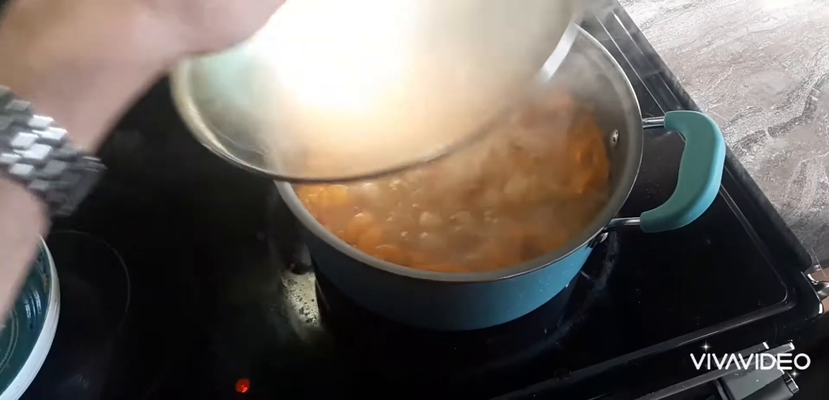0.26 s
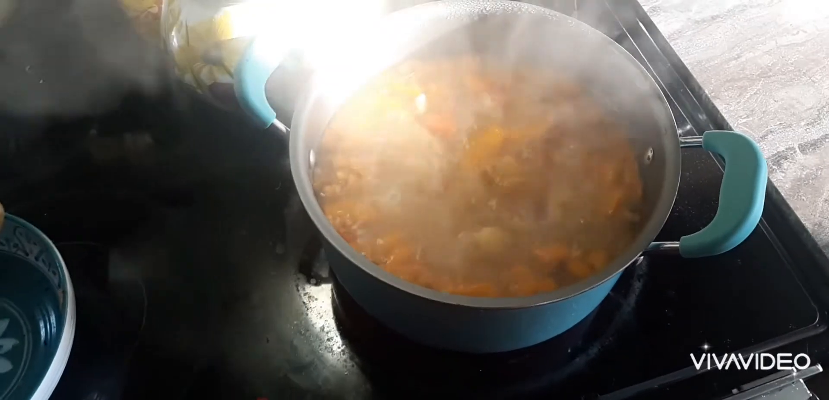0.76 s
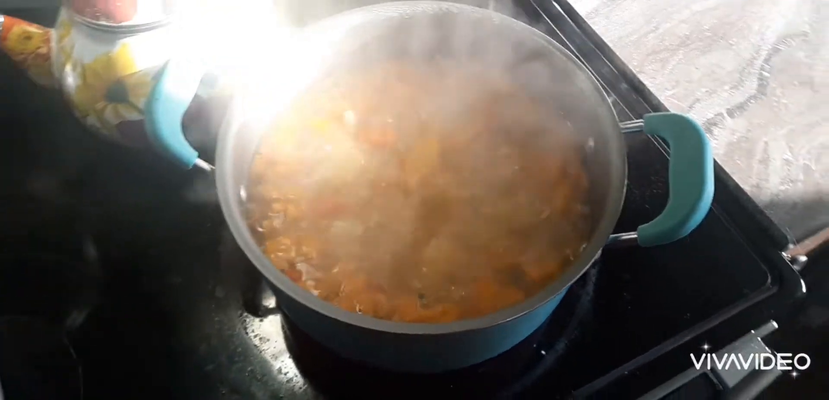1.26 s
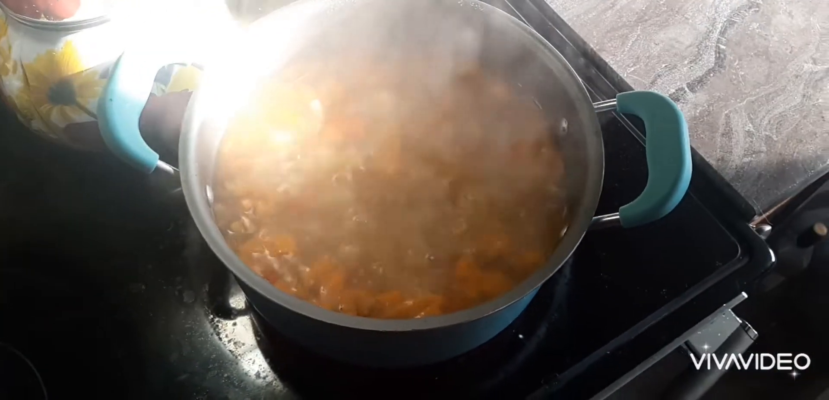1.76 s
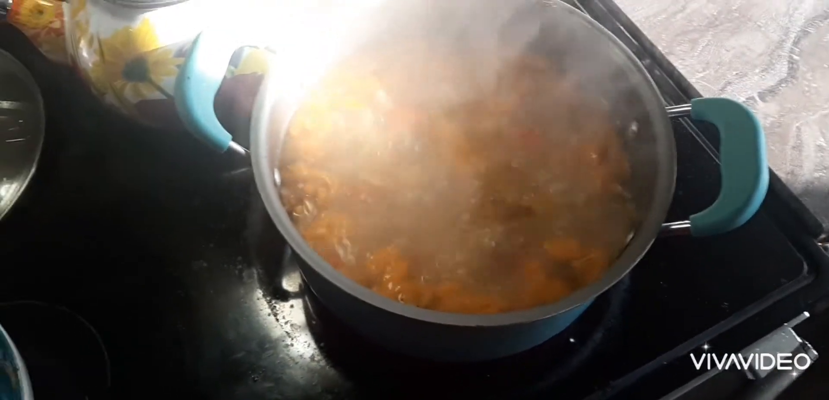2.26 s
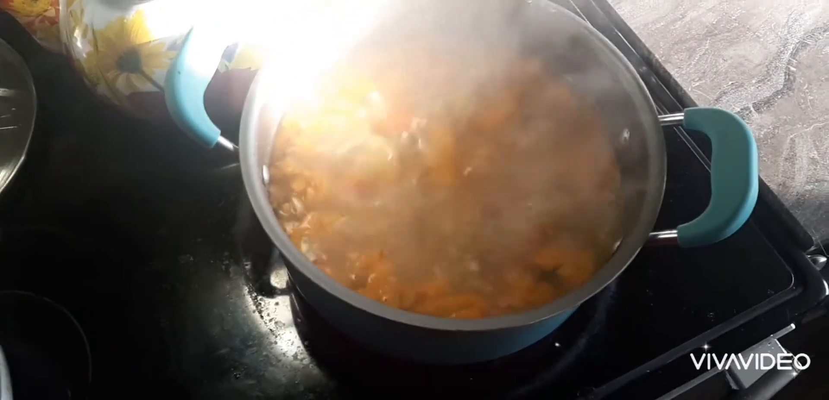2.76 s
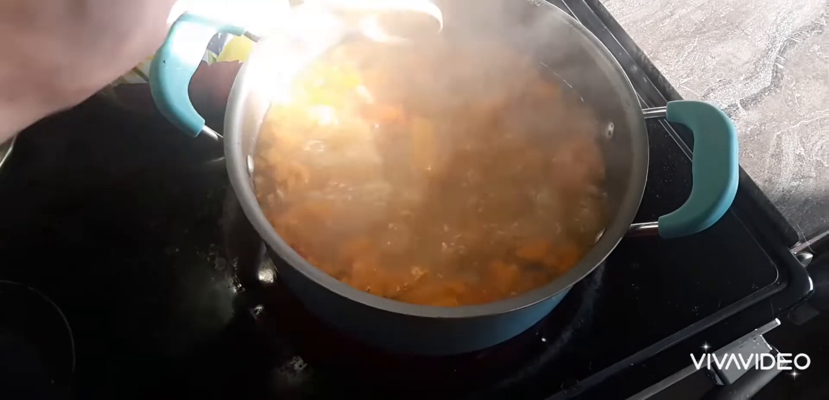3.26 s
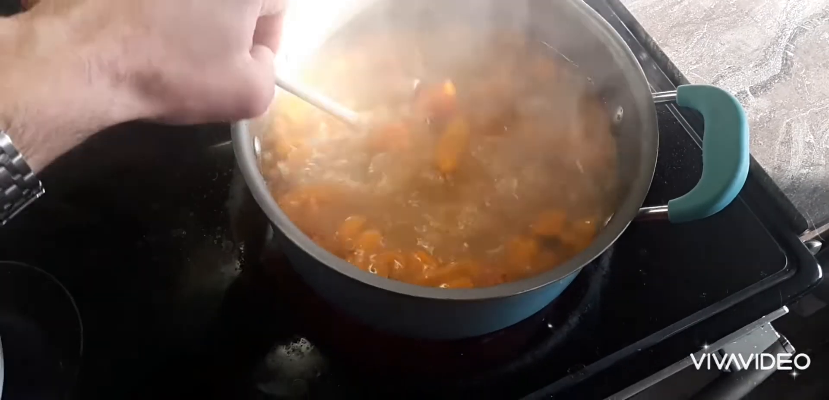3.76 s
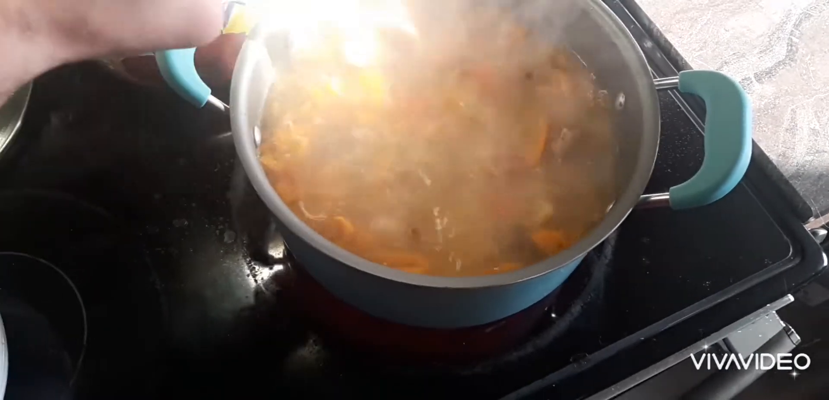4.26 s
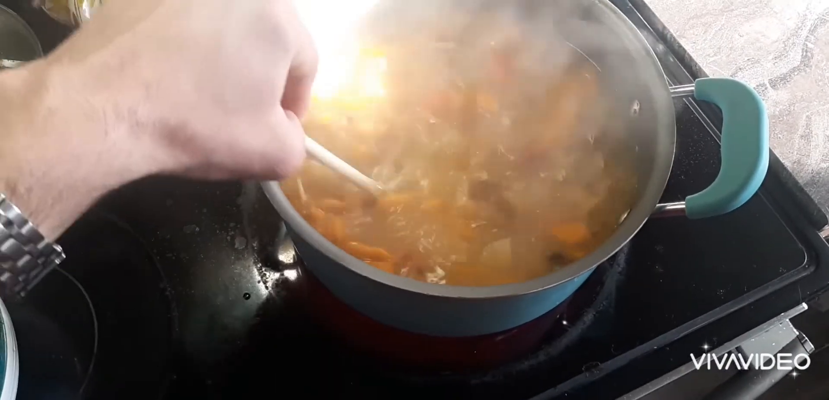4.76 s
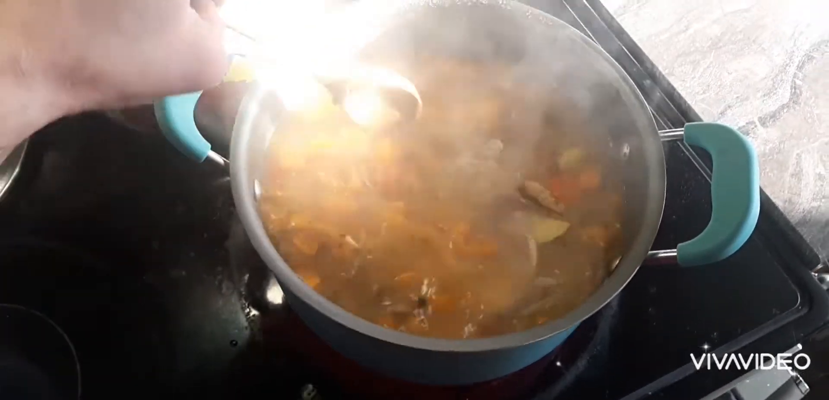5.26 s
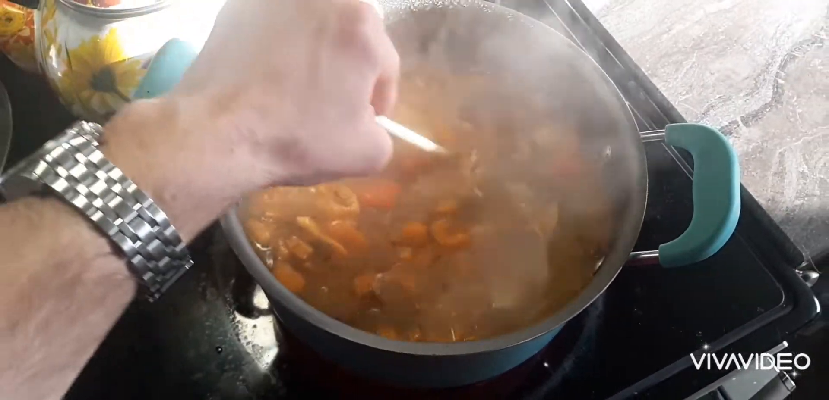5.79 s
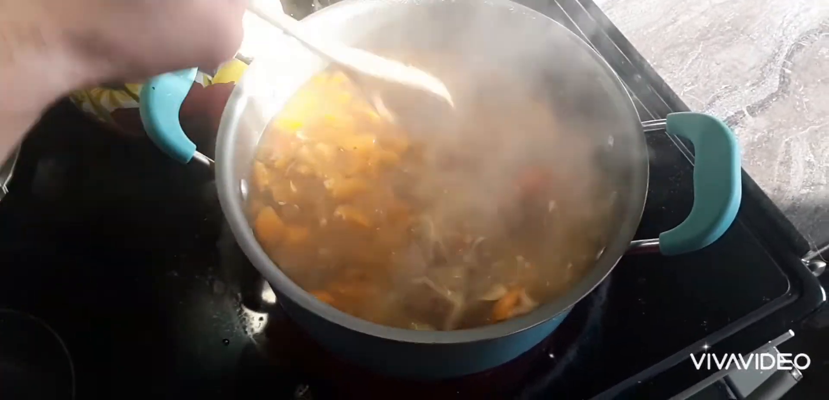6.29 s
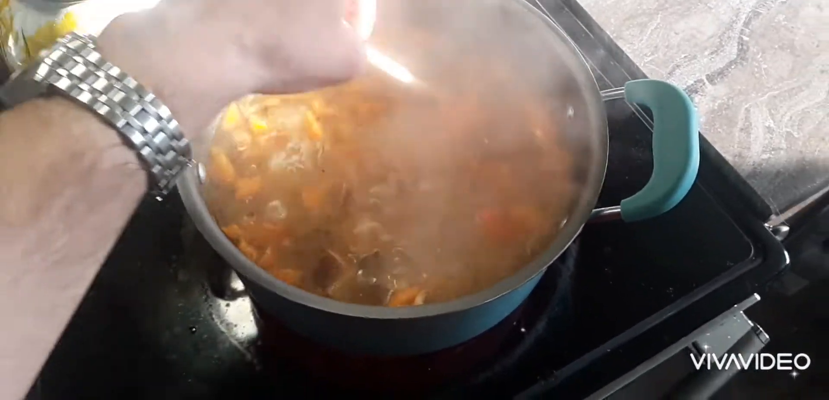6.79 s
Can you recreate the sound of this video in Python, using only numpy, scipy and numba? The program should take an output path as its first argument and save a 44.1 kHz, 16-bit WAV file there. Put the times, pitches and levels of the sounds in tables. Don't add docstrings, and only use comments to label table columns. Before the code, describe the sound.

Soup simmers softly in a pot; a glass lid clatters loudly onto the worktop, then a wooden spoon stirs and knocks the pot wall.

```python
import sys
import numpy as np
from scipy import signal
from scipy.fft import rfft, irfft, next_fast_len
from scipy.io import wavfile
from scipy.ndimage import uniform_filter1d
from numba import njit

SR = 44100
rng = np.random.default_rng(int(sys.argv[2]) if len(sys.argv) > 2 else 0)


def materialize(psi):
    bounded = np.clip(np.atleast_2d(psi).T, -1, 1)
    quanta = np.round(bounded * 32767).astype(np.int16)
    wavfile.write(sys.argv[1], SR, quanta)


def volts_from_decibels(level):
    exponent = np.asarray(level, float) / 20
    return 10 ** exponent


N = 310023
T = np.arange(N) / SR


def level(x, db):
    return x * volts_from_decibels(db) / np.sqrt(np.mean(x ** 2))


def band(x, lo_hz, hi_hz, order=2):
    return signal.sosfilt(signal.butter(order, [lo_hz, min(hi_hz, .45 * SR)], "band", fs=SR, output="sos"), x)


def colour(x, table):
    hz, db = np.transpose(table)
    count = x.shape[-1]
    size = next_fast_len(count)
    f = np.fft.rfftfreq(size, 1 / SR)
    gain = volts_from_decibels(np.interp(np.log(f + 1), np.log(hz), db))
    return irfft(rfft(x, size) * gain, size)[..., :count]


def walk(rate_hz):
    k = int(SR / rate_hz)
    steps = np.repeat(rng.standard_normal(N // k + 1), k)
    return uniform_filter1d(uniform_filter1d(steps, k), k)[:N]


def contact(t, push_s):
    return 1 - np.exp(-(t / push_s) ** 2)


def ring(hz, t60_s, push_s=0.00038, size=8000):
    t = np.arange(size) / SR
    return np.sin(2 * np.pi * hz * t) * np.exp(-np.log(1000) * t / t60_s) * contact(t, push_s)


def burst(lo_hz, hi_hz, decay_s, push_s=0.0004, size=1500):
    t = np.arange(size) / SR
    noise = level(band(rng.standard_normal(size), lo_hz, hi_hz), 0)
    return noise * np.exp(-t / decay_s) * contact(t, push_s)


def swells(rows, rise_s, fall_s, bright=0):
    gain = np.zeros(N)
    for s, hold_s, db, *tone in rows:
        near = slice(max(int((s - rise_s) * SR), 0), int((s + hold_s + 10 * fall_s) * SR))
        rise = np.clip((T[near] - s) / rise_s + 1, 0, 1)
        fall = np.exp(-np.maximum(T[near] - s - hold_s, 0) / fall_s)
        gain[near] = np.maximum(gain[near], volts_from_decibels(db + bright * sum(tone)) * rise * fall)
    return gain


def add(track, s, sound):
    i = int(s * SR)
    track[..., i:i + sound.shape[-1]] += sound[..., :N - i]


def pan(pan_db):
    return volts_from_decibels(np.array([[pan_db], [-pan_db]]) / 2)


def ports(x, lead_s, pan_db):
    size = next_fast_len(N)
    sides = np.array([[1], [-1]])
    turn = np.exp(1j * np.pi * np.fft.rfftfreq(size, 1 / SR) * lead_s * sides)
    return irfft(rfft(x, size) * turn, size)[:, :N] * pan(pan_db)


# (band [Hz], t60 [s], echo energy [dB])
ECHO_BANDS = [(113, 0.36, -6.5), (300, 0.23, -6), (700, 0.2, -9), (1500, 0.42, -6.5), (3000, 0.29, -5),
              (6300, 0.26, -9), (10200, 0.067, -6)]


def room(x):
    t = np.arange(SR // 2) / SR
    tail = 0
    for hz, t60_s, db in ECHO_BANDS:
        noise = band(rng.standard_normal((2, len(t))), hz / 1.55, hz * 1.55)
        mid, side = noise * np.exp(-np.log(1000) * t / t60_s) * contact(t, .005)
        both = mid + min(hz / 1100, 1) * side * np.array([[1], [-1]])
        tail = tail + both * volts_from_decibels(db) * np.sqrt(2 * hz / SR / np.sum(mid ** 2))
    return signal.fftconvolve(x[None], tail, axes=1)[:, :N]


# (frequency [Hz], level [dB rms])
HUM_LINES = [(53.8, -79.5), (118.4, -67.5), (269.2, -79), (522.2, -86), (672.9, -93.5)]
# (frequency [Hz], density [dB per Hz])
AIR_COLOUR = [(20, 14), (70, 17.5), (170, 12), (320, 4.5), (1250, -4.5), (4500, -4), (6400, 0.5),
              (11500, -12)]
AIR_DB = -69.5


def fridge():
    lines = np.zeros(N)
    for hz, db in HUM_LINES:
        gain = volts_from_decibels(db + 7.0 + 1.6 * walk(3.1))
        phase = 2 * np.pi * np.cumsum(hz * (1 + 0.0027 * walk(2.4))) / SR
        lines += gain * np.sin(phase)
    mid, left, right = colour(rng.standard_normal((3, N)), AIR_COLOUR)
    bass = signal.butter(1, 700, fs=SR, output="sos")
    air = np.array([signal.sosfilt(bass, mid - own) + own for own in (left, right)])
    return lines + air * volts_from_decibels(AIR_DB + 0.5) / np.std(band(air, 140, 15000))


@njit
def grains(start, hz, cycles, size, glide):
    out = np.zeros(N)
    for k in range(len(start)):
        w, z = 2 * np.pi * hz[k] / SR, size[k] + 0j
        fade = w / (2 * np.pi * cycles)
        p, turn = np.exp(1j * w - fade), np.exp(1j * w * glide * fade)
        for i in range(start[k], min(N, start[k] + int(5 / fade))):
            z *= p
            p *= turn
            out[i] += z.imag
    return out


def bubbles(lo_hz, hi_hz, cycles, glide, wash_db, count):
    when, pitch, rank = rng.random((count, 3)).T
    size = volts_from_decibels(-3.2 * np.log(rank + .01))
    hz = lo_hz * (hi_hz / lo_hz) ** pitch
    crowd = grains((when * N).astype(np.int64), hz, cycles, size, glide)
    wash = rng.standard_normal(N) * np.sqrt(SR / 2 / (hi_hz - lo_hz))
    return level(band(level(crowd, 0) + volts_from_decibels(wash_db) * wash, 0.83 * lo_hz, 0.97 * hi_hz), 0)


# (time [s], level [dB])
BOIL_VIGOUR = [(0, -58), (.3, -63), (.9, -61), (1.0, -68), (1.3, -65), (2.0, -56), (2.6, -59), (2.68, -69),
               (2.9, -65.5), (3.4, -59.5), (3.7, -61), (4.15, -70.5), (4.7, -66), (5.3, -72), (6.0, -88.5),
               (7.03, -78)]
# (time [s], hold [s], level [dB])
BUBBLE_HEAVES = [(.0, 0.013, -68), (.045, 0.07, -59), (.13, 0.075, -66), (.51, 0.017, -64),
                 (.66, 0.029, -70), (.8, 0.056, -55.5), (1.07, 0.011, -67), (1.11, 0.058, -58.5),
                 (1.21, 0.035, -58.5), (1.43, 0.011, -65), (1.54, 0.046, -62), (1.66, 0.069, -70),
                 (1.84, 0.057, -74), (1.93, 0.06, -72), (2.38, .05, -69), (2.49, 0.029, -56),
                 (2.7, 0.12, -63), (3.15, 0.028, -67), (3.35, 0.032, -69), (3.48, 0.13, -63),
                 (3.68, 0.012, -64), (3.83, 0.08, -66.5), (4.36, 0.024, -78), (4.54, 0.18, -64.5),
                 (5.05, .02, -68), (5.22, 0.044, -71.5), (5.54, 0.04, -67.5), (5.76, 0.061, -74),
                 (6.05, .02, -70.5), (6.3, 0.071, -85)]
# (time [s], hold [s], level [dB])
WALL_SLOPS = [(.23, 0.6, -84), (.7, 0.27, -75.5), (1.13, 0.077, -72.5), (1.3, 0.32, -75), (1.68, .12, -68),
              (1.87, 0.025, -71), (1.96, 0.051, -77), (2.36, 0.19, -74), (2.56, 0.67, -78.5),
              (3.3, 0.17, -72), (3.48, 0.17, -60), (3.67, 0.097, -65), (3.8, 0.29, -70.5),
              (4.22, 0.096, -70.5), (4.52, 0.22, -66.5), (4.7, 0.12, -63.5), (4.92, .1, -77),
              (5.16, 0.097, -86), (5.55, 0.076, -71.5), (5.68, 0.16, -78), (6.62, .05, -76.5),
              (6.88, 0.042, -82)]
# (time [s], hold [s], level [dB], brightness [dB])
SURFACE_SIZZLES = [(0.098, 0.18, -81.5, 9.5), (0.274, 0.23, -80, 11), (0.559, 0.17, -73.5, 4.5),
                   (0.753, 0.24, -68, -3.5), (1.049, 0.087, -70.5, 4.5), (1.209, .24, -66.5, 3),
                   (1.506, 0.22, -66.5, 1.5), (1.78, .1, -74.5, 9), (1.939, 0.17, -75, 11.5),
                   (2.361, 0.18, -69, 5.5), (2.679, 0.074, -73.5, 4.5), (2.78, 0.1, -79, 10),
                   (2.961, 0.55, -72.5, 2), (3.492, 0.14, -66, 3.5), (3.682, 0.086, -66, 3),
                   (3.801, 0.23, -63.5, -2.5), (4.02, 0.28, -66, -4.5), (4.358, 0.14, -83, 8.5),
                   (4.517, 0.16, -67, 1), (4.657, .22, -71, -1), (4.932, 0.29, -93, 21.5),
                   (5.211, 0.064, -70.5, -6), (5.41, 0.15, -80.5, -3), (5.655, .2, -84.5, 7),
                   (6.154, 0.15, -76, -3), (6.299, 0.32, -73.5, 1), (6.876, .06, -75, 3),
                   (6.998, 0.033, -81, 5)]
# (time [s], hold [s], level [dB])
STEAM_PUFFS = [
    (1.07, 0.068, -76),
    (3.8, 0.13, -63.5),
    (4.62, 0.12, -73),
    (4.97, .1, -78),
]
# time [s], hold [s], level [dB], pitch [Hz]
SPOON_TRICKLE = (5.25, .18, -83, 1023)
HEAVE_S, SLOP_S, SIZZLE_S = (0.0054, 0.0073), (0.032, .03), (0.018, .02)  # (rise [s], fall [s])
CALM_DB = -82


def soup():
    boil = volts_from_decibels(np.interp(T, *np.transpose(BOIL_VIGOUR))) + swells(BUBBLE_HEAVES, *HEAVE_S)
    slosh = volts_from_decibels(-24) * boil + swells(WALL_SLOPS, *SLOP_S)
    fizz = volts_from_decibels(CALM_DB - 5) + swells(SURFACE_SIZZLES, *SIZZLE_S)
    spray = volts_from_decibels(CALM_DB) + swells(SURFACE_SIZZLES, *SIZZLE_S, bright=0.87)
    mist = volts_from_decibels(CALM_DB) + volts_from_decibels(-1.5) * swells(SURFACE_SIZZLES, *SIZZLE_S, bright=0.56)
    mist = mist + swells(STEAM_PUFFS, *SLOP_S)
    gust = volts_from_decibels(1.3 * walk(30) + 3 * walk(150))
    boil = boil * volts_from_decibels(2.2 * walk(18))
    deep = 0.82 * bubbles(250, 540, 6., 0.23, -6.5, count=900)
    deep += 0.2 * bubbles(100, 170, 1.1, 0.11, -2.5, count=400)
    out = ports(boil * deep, 0.00018, -.3)
    for side in range(2):
        out[side] += 0.11 * boil * bubbles(390, 900, 2.5, 0.87, -6, count=600)
        slap = bubbles(720, 1150, 1.4, 0.042, -3.4, count=900)
        slap += 0.61 * bubbles(1400, 2700, 2.5, 0.11, -4.5, count=1200)
        out[side] += 0.94 * slosh * slap
        out[side] += fizz * gust * bubbles(3400, 4350, 12, 0.11, -2.0, count=3000)
        out[side] += spray * gust * bubbles(5700, 7000, 10.0, .04, -2.3, count=3000)
        out[side] += .8 * mist * gust * bubbles(8300, 10800, 7.0, 0.013, .6, count=3000)
    *stream, hz = SPOON_TRICKLE
    trickle = level(band(rng.standard_normal(N), .97 * hz, 1.03 * hz), 0)
    return out + swells([stream], *SLOP_S) * trickle


# (time [s], level [dB], pitch [Hz])
BUBBLE_POPS = [(0.7537, -43, 5800), (0.7968, -44, 5600), (1.1653, -41.5, 4100), (1.4024, -56, 3850),
               (1.604, -43, 6440), (1.62, -41, 6040), (1.701, -48, 6150), (1.71, -41, 7140),
               (1.7489, -41.5, 6100), (2.37, -54, 3463), (2.4336, -43, 5900), (2.806, -46.5, 6040),
               (3.6032, -52, 5730), (3.7617, -42, 6970), (3.7824, -51, 9800), (3.986, -39, 3880),
               (4.12, -41, 3810), (4.2262, -42, 3920), (4.347, -46, 6110), (4.722, -43, 6600),
               (5.0156, -50, 5990), (5.2038, -46, 7700), (5.437, -47, 5900), (5.6022, -44.5, 6210),
               (6.3515, -45.5, 3920), (6.576, -51, 6820), (6.6, -40, 6910), (6.7827, -35.5, 3550),
               (6.8717, -46.5, 6620), (6.992, -48, 8500)]


def pops():
    out = np.zeros(N)
    for s, db, hz in BUBBLE_POPS:
        spit = burst(3000, 8800, 0.00082, 0.00014, size=600)
        add(out, s, volts_from_decibels(db - 2.3) * (ring(hz, 0.0108, 0.00079, size=600) + 0.84 * spit))
    return out


# (time [s], knock level [dB], knock pitch [Hz], tick re knock [dB], thump re knock [dB])
RIM_CLINKS = [(0.524, -61, 656, -5, -3.5), (3.451, -43, 600, 12, -23), (3.456, -35.5, 1500, -8, -20),
              (3.5385, -42, 980, -3, -12), (3.621, -44, 331, -30, -23), (3.677, -62, 595, 11, 1),
              (3.629, -51, 1010, 0, -25), (3.686, -54.5, 1020, 11, -9), (4.237, -68.5, 942, 19.5, 1),
              (4.465, -50, 589, 6.5, -7), (4.478, -40.5, 1000, 5.5, -9), (4.509, -62, 600, 0, 4.5),
              (4.645, -37, 1294, -33, -16.5), (4.6495, -35, 700, -18, -18), (4.661, -46.5, 610, -25, -10),
              (4.67, -45, 920, -25, -32), (4.684, -42, 793, -20, -19), (7.019, -72, 703, 16, -12)]
# (time [s], knock level [dB], knock pitch [Hz], tick re knock [dB])
WALL_TAPS = [(0.7096, -41.5, 1000, -25), (4.642, -33, 1000, -34), (4.9089, -45, 1310, -28),
             (5.146, -39.5, 1404, -35), (5.546, -45, 1090, -29), (5.634, -55.5, 1080, -20),
             (5.671, -53, 1927, -17), (5.702, -47.5, 1460, -9.5), (5.772, -56, 1024, -2),
             (6.602, -56.5, 1485, 1), (6.639, -55.5, 1014, -12), (6.7369, -46, 1620, -14),
             (6.7515, -34, 1920, 2), (6.7688, -44, 2080, -6), (6.806, -43, 1810, -10),
             (6.787, -47, 960, -8), (6.8112, -41, 1000, -4), (6.8407, -38.5, 1690, -15),
             (6.8547, -43.5, 900, -5.5), (6.872, -51.5, 990, 5.5)]
TAP_THUMP_DB = -29
KNOCK_CYCLES, KNOCK_PUSH_CYCLES = 15, 1.1
SIDE_SHARE, KNOCK_ROUGH = .25, .15
TICK_WALL_DB = -6


def spoon(rows):
    out = np.zeros((2, N))
    thump = ring(143.5, 0.15) - 0.54 * ring(349, 0.066) + 0.85 * ring(501, 0.15)
    knock_paths, tick_paths = np.ones((2, 1)), volts_from_decibels(np.array([[0], [TICK_WALL_DB]]))
    for s, db, hz, tick_db, thump_db in rows:
        spread, push_s = rng.standard_normal(2), KNOCK_PUSH_CYCLES / hz
        sides = ring(0.733 * hz, 0.0085, push_s, size=1500) + ring(1.31 * hz, 0.013, push_s, size=1500)
        knock = ring(hz, KNOCK_CYCLES / hz, push_s, size=1500) - SIDE_SHARE * sides
        knock = knock + KNOCK_ROUGH * burst(0.64 * hz, 1.28 * hz, 0.004)
        steel = ring(3850 * (1 + .03 * spread[0]), .005, size=1500)
        steel = steel - .6 * ring(3000 * (1 + .06 * spread[1]), .005, size=1500)
        tick = 2.71 * steel + 0.47 * burst(1330, 7700, 0.0026) + 0.28 * burst(8200, 10550, 0.002)
        add(out, s, knock_paths * volts_from_decibels(db + 5.5) * knock)
        add(out, s, tick_paths * volts_from_decibels(db + tick_db + 3.5) * tick)
        add(out, s, knock_paths * volts_from_decibels(db + thump_db + 5.5) * thump)
    return out


# (time [s], thud level [dB], rim crack re thud [dB])
LID_TOUCHES = [(2.0428, -10.5, -18), (2.087, -7.5, -16), (2.097, -13, -17), (2.11, -15.5, 1),
               (2.113, -14, -10), (2.118, -3.5, -5.5), (2.126, -9, -6.5), (2.1309, -7, -18.5),
               (2.138, -8.5, -14), (2.146, -8, -14), (2.153, -.5, -14), (2.171, -16, -9),
               (2.181, -18, -14.5)]
# (frequency [Hz], level [dB], t60 [s])
THUD_MODES = [(128, -8, .1), (149.7, -20.5, 0.25), (191.8, -9.5, 0.24), (291.7, -11.5, 0.15),
              (344, -5.5, 0.045), (366, 1, 0.13), (418, 1, 0.048), (460.7, 1, 0.026), (494.5, 3.5, 0.082),
              (544, -1, 0.045), (670, -9, 0.03), (855, -5.5, .03), (960, -15, 0.046)]
# (frequency [Hz], level [dB], t60 [s])
GLASS_MODES = [(1121.4, -11.5, 0.042), (1340, -10, 0.019), (1602, -26.5, 0.7), (1650, -5, 0.03),
               (1850, -6.5, 0.041), (2330, -8, 0.056), (2580, -2.5, 0.054), (2930, 4, 0.064),
               (3000, -4.5, .035), (3194, -7.5, 0.017), (4095, -3, 0.098), (4930, -8, 0.072)]
# (frequency [Hz], density [dB per Hz])
CRACK_COLOUR = [(400, -29.5), (750, -2.5), (1800, -8), (2900, -2), (4500, -10.5), (8000, -17.5),
                (10500, -18.5), (12000, -30.5)]
# start [s], end [s], level [dB]
LID_SLIDE = (2.435, 2.49, -58.5)
# (frequency [Hz], width [Hz], level [dB])
RUB_BANDS = [(1000, 580, -0.18), (2390, 180, -2.16), (3300, 360, 0.38), (4250, 360, -2), (5900, 500, 0.074)]
THUD_SCATTER_DB, GLASS_SCATTER_DB = 2., 2.6


def lid():
    body, rim = np.zeros(N), np.zeros((2, N))
    thuds = np.array([volts_from_decibels(db) * ring(hz, t60_s, 0.00073, size=20000) for hz, db, t60_s in THUD_MODES])
    thuds *= (-1.) ** ((np.arange(len(thuds)) - 1) // 4)[:, None]
    chimes = np.array([volts_from_decibels(db) * ring(hz, t60_s, size=20000) for hz, db, t60_s in GLASS_MODES])
    crack_fade = np.exp(-np.arange(4096) / SR / .006)
    for s, thud_db, crack_re_thud_db in LID_TOUCHES:
        crack_db = thud_db + crack_re_thud_db
        mix = rng.standard_normal((3, 16))
        thud = volts_from_decibels(THUD_SCATTER_DB * mix[0])[:len(thuds)] @ thuds
        glass = (volts_from_decibels(GLASS_SCATTER_DB * mix[1]) * np.sign(mix[2]))[:len(chimes)] @ chimes
        crack = level(colour(rng.standard_normal((3, 4096)), CRACK_COLOUR), 0) * crack_fade
        add(body, s, volts_from_decibels(thud_db - 12.0) * thud + volts_from_decibels(crack_db - 16) * glass)
        add(body, s, volts_from_decibels(crack_db - 11.5) * crack[0])
        add(rim, s, volts_from_decibels(crack_db - 1) * crack[1:])
    start, end, db = LID_SLIDE
    noise = rng.standard_normal((2, int((end - start) * SR)))
    rub = 0
    for hz, width_hz, top_db in RUB_BANDS:
        rub = rub + volts_from_decibels(top_db) * level(band(noise, hz - width_hz / 2, hz + width_hz / 2), -5.0)
    add(rim, start, volts_from_decibels(db) * rub)
    return body, rim


def scene():
    (glass, rim), spit = lid(), pops()
    clink, clink_far = spoon(RIM_CLINKS)
    tap, tap_far = spoon([(*row, TAP_THUMP_DB) for row in WALL_TAPS])
    rim = rim * pan(-1.5)
    direct = ports(glass, 0.0003, -.6) + rim
    direct = direct + ports(clink, 0.00017, -3.5) + ports(tap, 0.00014, -5.5) + ports(spit, 1.5e-4, -2.3)
    to_walls = glass + rim[0] + volts_from_decibels(3) * clink_far + tap_far + volts_from_decibels(-2) * spit
    return direct + room(to_walls) + soup() + fridge()


def roll_off(x):
    return signal.sosfilt(signal.butter(12, 12400, fs=SR, output="sos"), x)


CEILING, TOP_HZ, BOTTOM_HZ = 1.15, 11180, 71.4


def record(dry):
    soft = CEILING * np.tanh(0.93 * dry / CEILING)
    cut = signal.sosfilt(signal.ellip(6, .3, 45, TOP_HZ, fs=SR, output="sos"), soft)
    cut = signal.sosfilt(signal.butter(2, BOTTOM_HZ, "high", fs=SR, output="sos"), cut)
    return roll_off(cut)


dry = scene()
out = record(dry)
materialize(out)
```